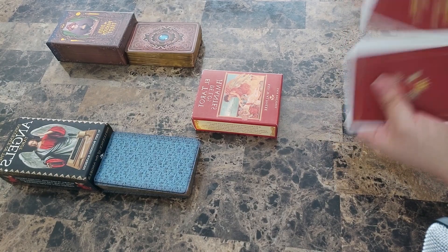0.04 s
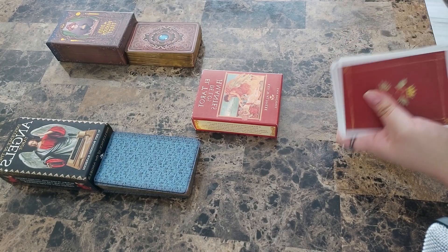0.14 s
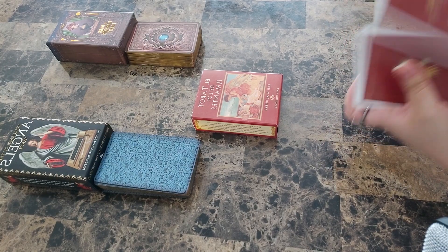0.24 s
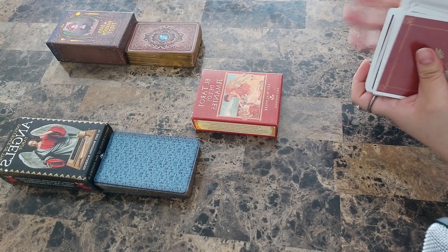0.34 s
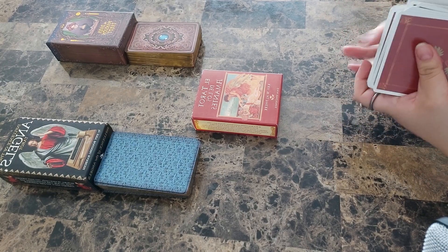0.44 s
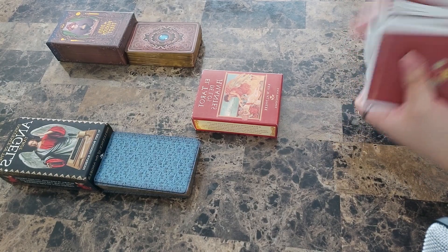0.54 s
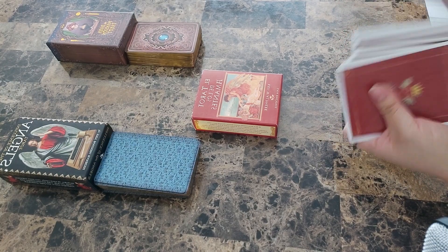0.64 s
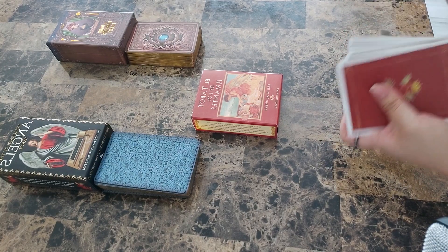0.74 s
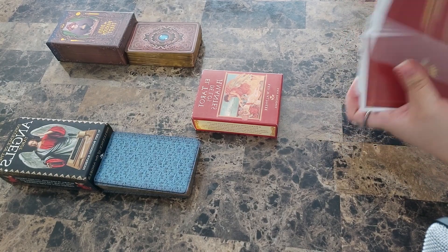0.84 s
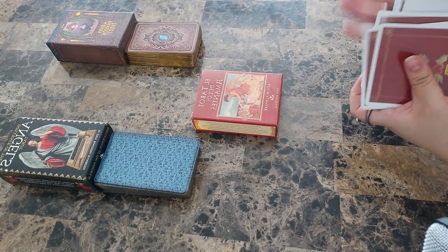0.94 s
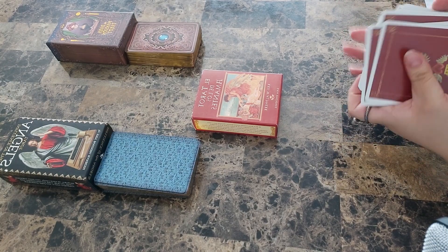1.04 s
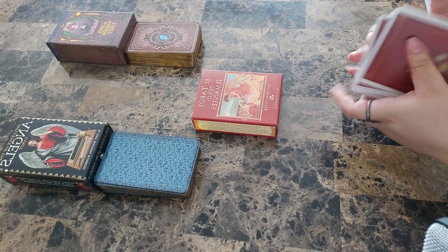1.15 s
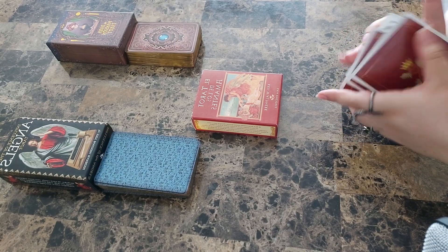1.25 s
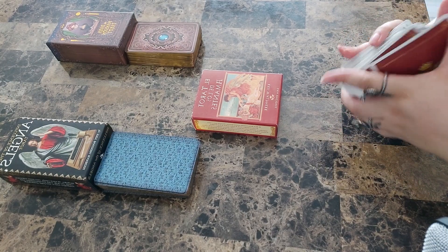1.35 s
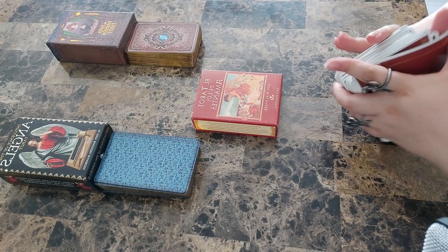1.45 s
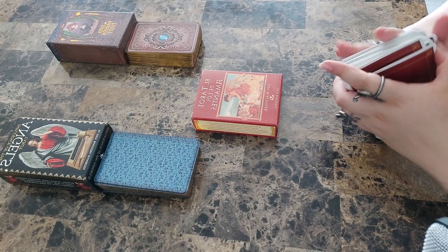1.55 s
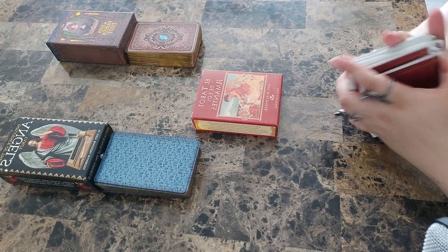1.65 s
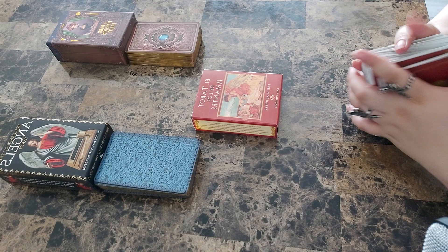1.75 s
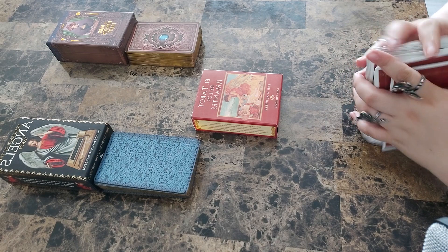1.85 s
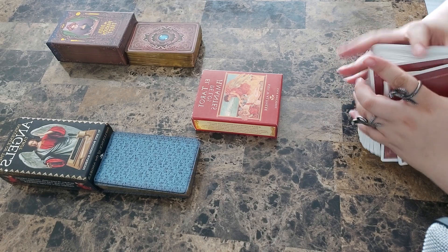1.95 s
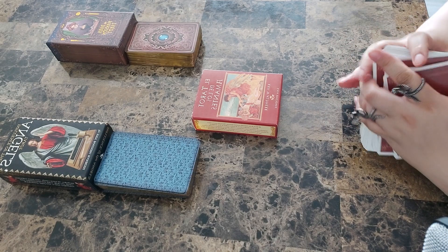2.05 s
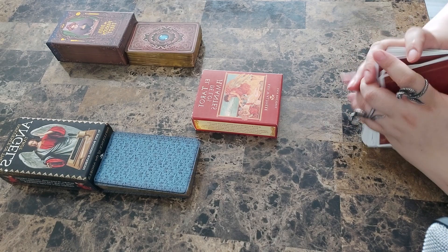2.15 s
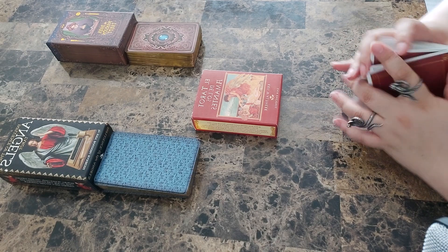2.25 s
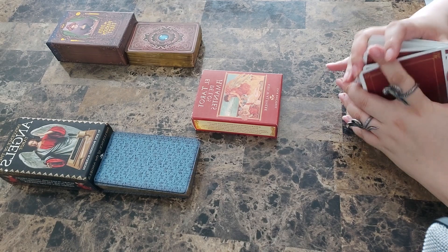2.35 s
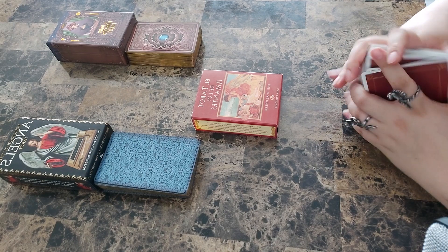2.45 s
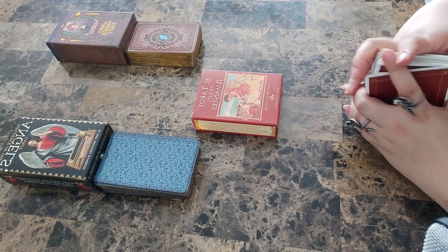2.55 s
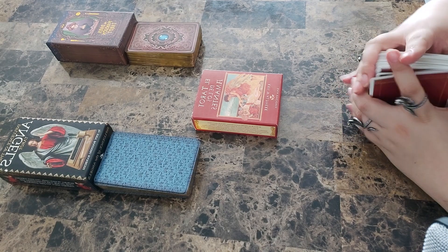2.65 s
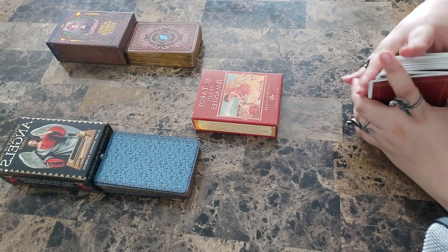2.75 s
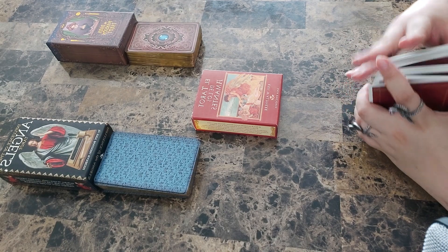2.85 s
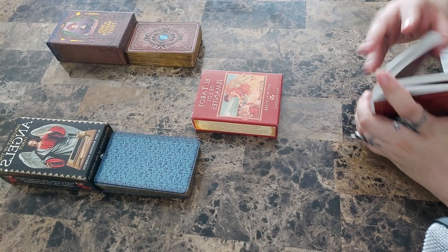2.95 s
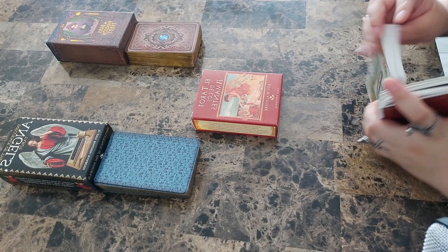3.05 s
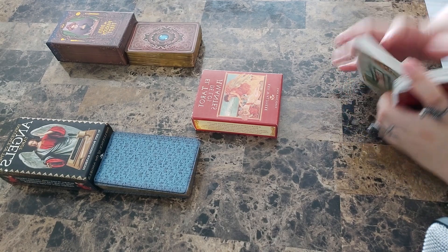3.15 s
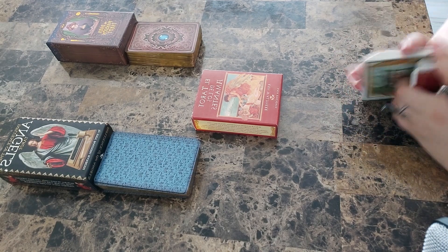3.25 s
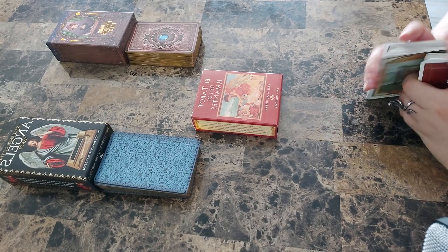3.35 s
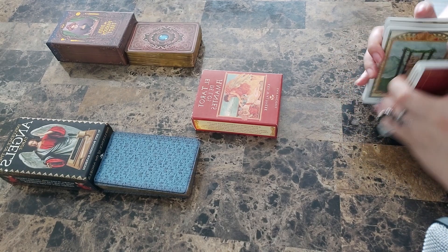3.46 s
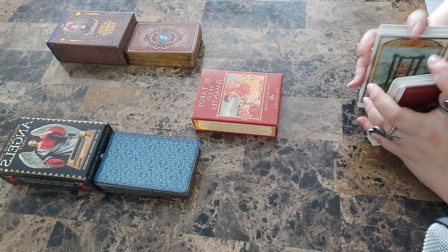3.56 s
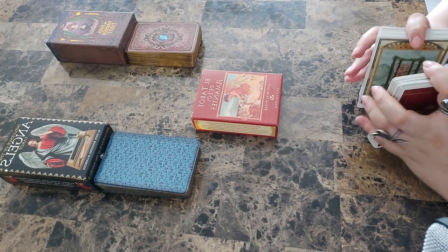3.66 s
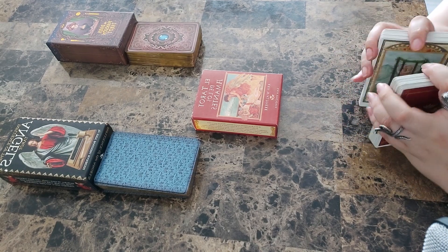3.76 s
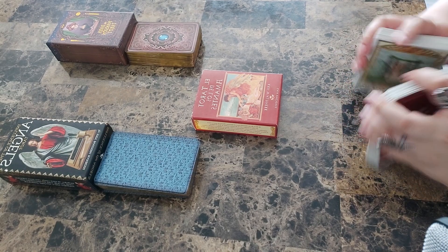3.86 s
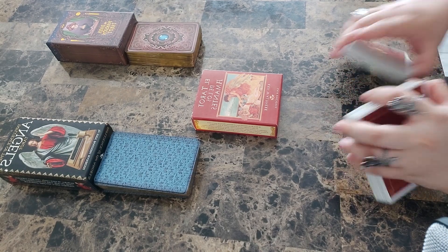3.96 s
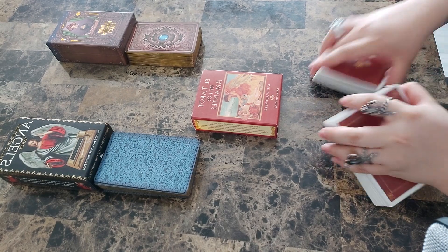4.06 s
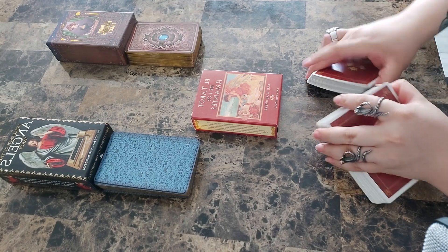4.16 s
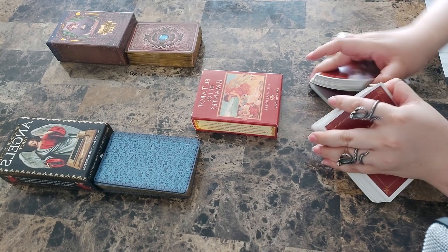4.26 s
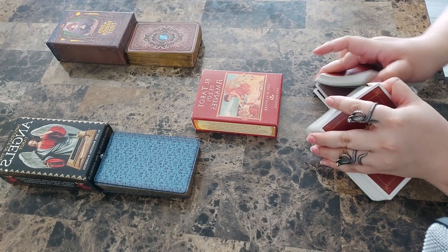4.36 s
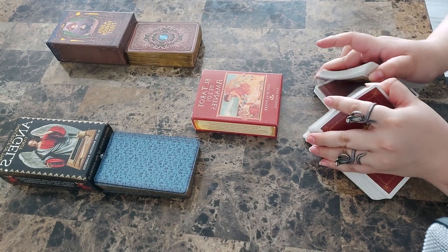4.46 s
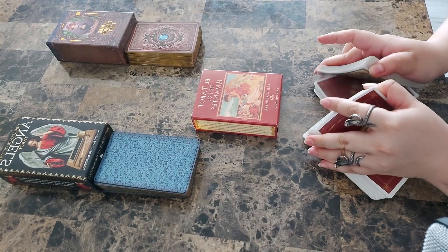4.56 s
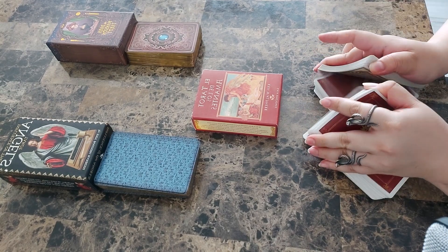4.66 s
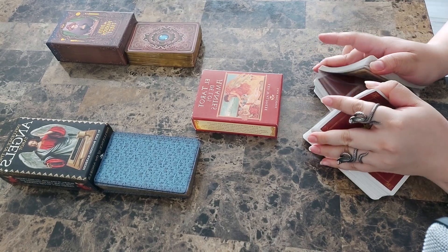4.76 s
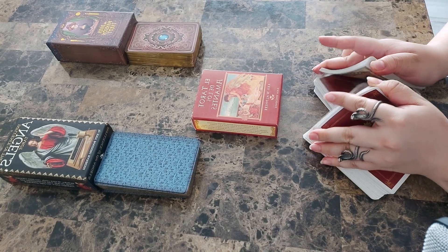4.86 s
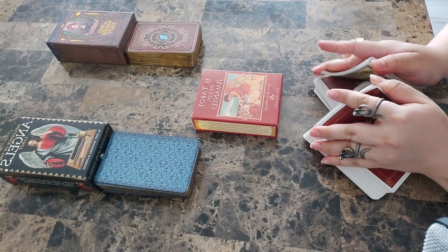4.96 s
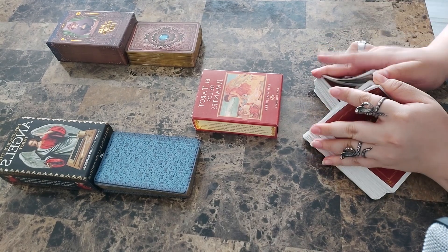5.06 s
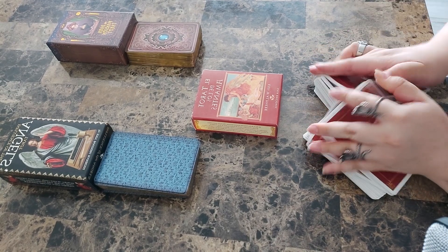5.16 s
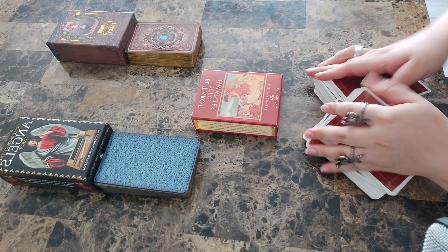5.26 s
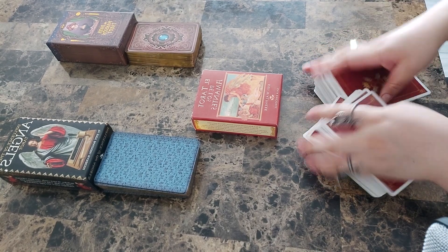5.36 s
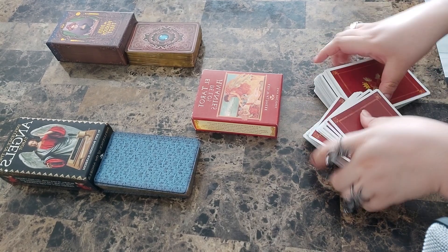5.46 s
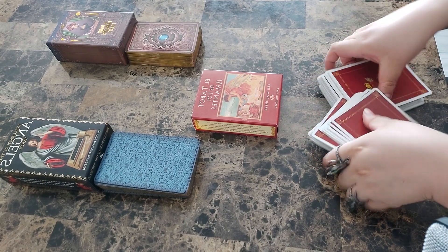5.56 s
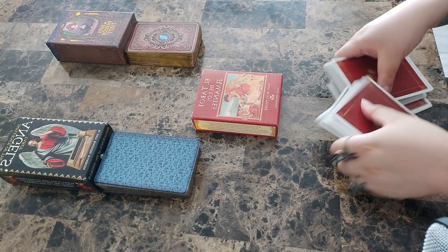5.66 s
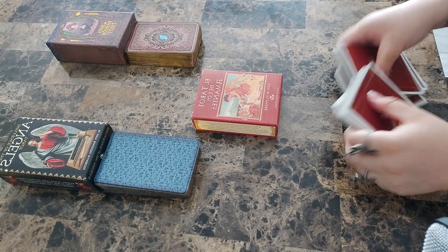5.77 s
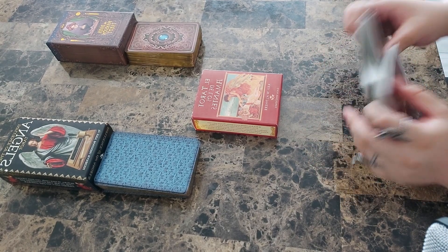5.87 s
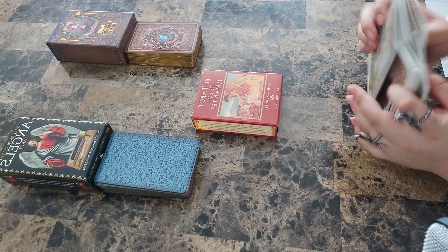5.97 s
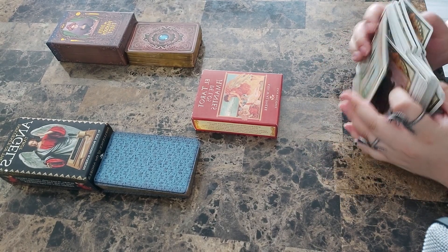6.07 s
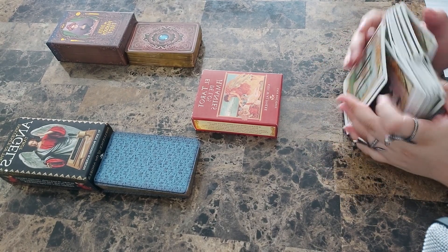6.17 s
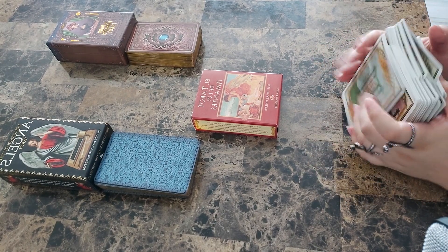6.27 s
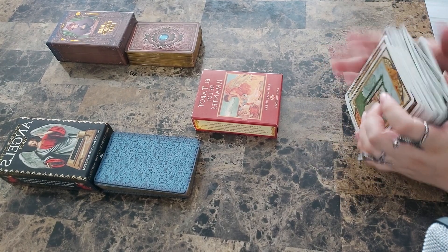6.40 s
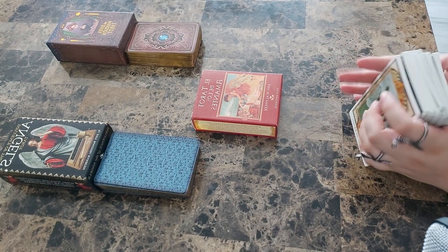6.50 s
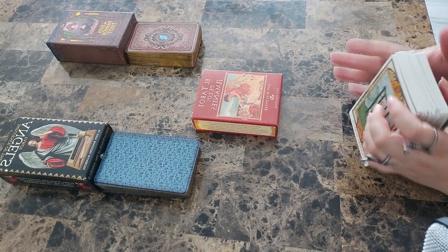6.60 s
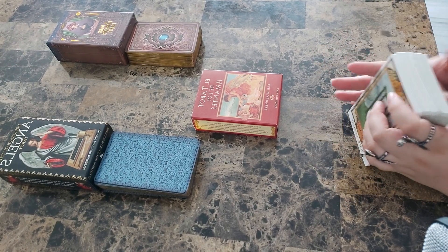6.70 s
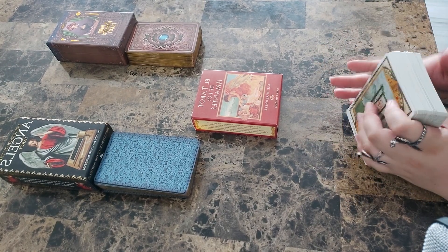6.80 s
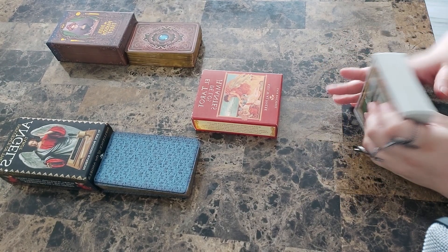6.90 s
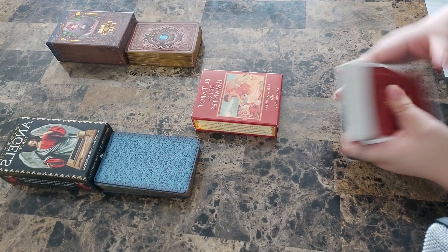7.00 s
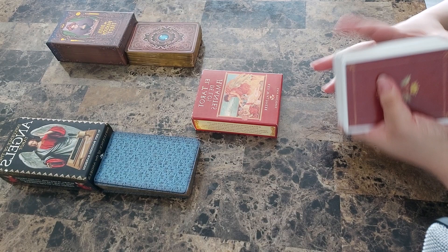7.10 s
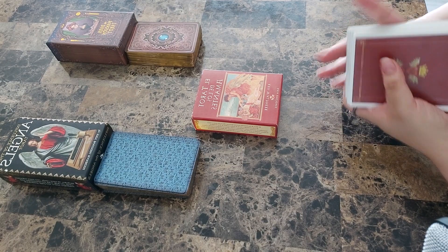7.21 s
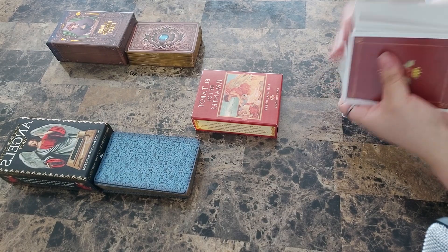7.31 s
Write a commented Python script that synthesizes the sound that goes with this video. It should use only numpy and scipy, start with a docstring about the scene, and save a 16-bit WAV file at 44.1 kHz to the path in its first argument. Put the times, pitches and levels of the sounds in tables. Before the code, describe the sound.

Hands shuffle a thick deck of large cards over a stone table: soft scrapes and slaps, a loud crackling riffle, then firm packet smacks in an echoing room.

```python
"""Card edges snap and packets slap together as two hands shuffle a thick deck of large cards
over a stone table in a bare, echoing room: short noise bursts ring the deck and the table.
Packets scrape into each other as noise with a quick bite, faces swish past one another as swelling
airy noise, deck and knuckles knock on the table modes and presses rumble through them.
Decaying noise makes the reflections, over a faint steady rumble and hiss of the house."""
import sys
import numpy as np
from scipy import signal
from scipy.io import wavfile
from scipy.ndimage import map_coordinates

SR = 44100
rng = np.random.default_rng(int(sys.argv[2]) if len(sys.argv) > 2 else 0)


def generate_wav(signal):
    """Clip the signal to [-1, 1] and save it as 16-bit WAV at the path in sys.argv[1]."""
    frames = np.transpose(np.atleast_2d(signal))
    scaled = np.clip(frames, -1, 1) * 32767
    pcm = np.round(scaled).astype(np.int16)
    wavfile.write(sys.argv[1], SR, pcm)


N = 323694

# Resonances of the stone table. Each row: centre in Hz, width in Hz, level in dB.
TABLE_MODES = [(99.7, 28, 1), (140, 18, 3), (200.4, 17.7, 2), (297.6, 44, 3), (367, 116, -2),
               (507, 140, -0.5)]
OPEN_HZ = 7000   # lowpass corner of a contact at brightness 0


def from_db(db):
    """Amplitude gain of a level in dB."""
    return 10 ** (np.asarray(db) / 20)


def rms_one(x):
    """Scale to an RMS of 1."""
    return x / np.sqrt(np.mean(x ** 2) + 1e-20)


def at_hz(points, hz):
    """Read a curve of (Hz, value) points along log frequency."""
    curve_hz, values = np.transpose(points)
    return np.interp(np.log(hz), np.log(curve_hz), values)


def over_time(points):
    """Draw a curve of (s, value) points over the whole scene."""
    return np.interp(np.arange(N) / SR, *np.transpose(points))


def band(x, low_hz, high_hz, order=2):
    """Bandpass; the tiny offset keeps the filter out of denormal numbers."""
    sos = signal.butter(order, [low_hz, high_hz], "band", fs=SR, output="sos")
    return signal.sosfilt(sos, x + 1e-18)


def resonance(x, hz, width_hz):
    """One damped mode: a two-pole resonator that rings longer the narrower it is."""
    r = np.exp(-np.pi * width_hz / SR)
    poles = [1, -2 * r * np.cos(2 * np.pi * hz / SR), r * r]
    return (1 - r * r) / 2 * signal.lfilter([1, 0, -1], poles, x + 1e-18)


def resonate(x, modes):
    """Parallel resonances with alternating signs."""
    out = 0
    for k, (hz, width_hz, level_db) in enumerate(modes):
        out = out + (-1) ** k * from_db(level_db) * resonance(x, hz, width_hz)
    return out


def grit(spread_db):
    """Dense contact noise whose grains have uneven sizes."""
    size = np.minimum(rng.exponential(1, N), 5)
    return rms_one(rng.standard_normal(N) * from_db(spread_db * size))


def swells(rows, rise_db_per_s, fall_db_per_s):
    """Gain of gestures that rise, hold and fall at steady dB rates; their powers add."""
    t = np.arange(0, N / SR + .01, .002)
    s, db, hold = np.transpose(rows)[:, :, None]
    before = np.maximum(s - t, 0)
    after = np.maximum(t - s - np.abs(hold), 0)
    level_db = db - rise_db_per_s * before - fall_db_per_s * after
    gain = np.sqrt(np.sum(from_db(level_db) ** 2, axis=0))
    return np.interp(np.arange(N) / SR, t, gain)


def contacts(starts, levels_db, brightness, lengths, shape, first_touch_db, dullest_hz, order, crack_s=None):
    """Rows of contact force, one for each level column; brightness sets the lowpass on the first."""
    out = np.zeros((levels_db.shape[1], N))
    noise = grit(spread_db=5.0)
    lengths = np.maximum(lengths, 5e-4)
    for s, gains, bright, length in zip(starts, from_db(levels_db), brightness, lengths):
        i = round(s * SR)
        count = min(N - i, int(6 * length * SR))
        force = shape(np.arange(count) / (length * SR)) * noise[i:i + count]
        force[0] += from_db(first_touch_db)   # the clean click of the first touch
        force = gains[:, None] * force
        if crack_s:   # the second row is shorter still
            force[1] *= np.exp(-np.arange(count) / (crack_s * SR))
        top_hz = np.clip(OPEN_HZ * 2 ** bright, dullest_hz, 15000)
        lowpass = signal.butter(order, top_hz, fs=SR, output="sos")
        force[0] = signal.sosfilt(lowpass, force[0])
        out[:, i:i + count] += force
    return out


def octave_noise(length, step):
    """Yields centre Hz and stereo noise of each band; the two ports agree in the bass only."""
    edges_hz = 25 * 2 ** np.arange(0, 9.6, step)   # step in octaves
    white = rng.standard_normal((2, 2, length))
    for k, (low, high) in enumerate(zip(edges_hz, edges_hz[1:])):
        mid, side = band(white[k % 2], low, high)
        hz = np.sqrt(low * high)
        alike = .93 / (1 + (hz / 900) ** 2.7)
        yield hz, np.sqrt(1 + alike) * mid + np.sqrt(1 - alike) * side * [[1], [-1]]


def ambience():
    """Faint steady rumble and hiss of the house: noise bands weighted by a spectrum."""
    # Spectral tilt of the house. Each row: frequency in Hz, relative density in dB per Hz.
    spectrum = [(25, -29.5), (55, -6), (85, -24.5), (120, -8.5), (146, -9), (185, -6.5), (260, -19),
                (500, -28.5), (1020, -32), (16000, -59)]
    level_db = -59
    noise = sum(from_db(at_hz(spectrum, hz)) * part for hz, part in octave_noise(N, step=.5))
    return from_db(level_db) * rms_one(noise)


def reflections():
    """Dense reflections that build up at once and die band by band; mean energy 1 per port."""
    # How long the bare room rings. Each row: frequency in Hz, time to fall by 60 dB in seconds.
    decay_times = [(120, 0.51), (500, 0.35), (2000, 0.43), (5000, 0.36), (12000, 0.26)]
    buildup_s = 0.00081
    t = np.arange(SR) / SR
    echo = sum(part * from_db(-60 * t / at_hz(decay_times, hz)) for hz, part in octave_noise(SR, step=.5))
    echo = echo * (1 - np.exp(-(t / buildup_s) ** 2))
    return echo / np.sqrt(np.sum(echo ** 2) / 2)


def room(x, count=4):
    """Several random reflection patterns fade into one another in turn, so no one echo colour stays."""
    turn_s = .45   # seconds from one pattern to the next
    turn = np.arange(N) / SR / turn_s
    out = 0
    for k in range(count):
        distance = (turn - k + count / 2) % count - count / 2   # the patterns recur in turn
        share = np.cos(np.pi / 2 * np.clip(distance, -1, 1))
        out = out + signal.fftconvolve((x * share)[None], reflections(), axes=1)[:, :N]
    return out


def ports(near):
    """The left port hears later, by a lag that wanders at random; the stereo balance drifts."""
    # Stereo balance. Each row: time in seconds, left minus right level in dB.
    pan_points = [(0, 1), (.8, -3.5), (1.8, 2.5), (3.7, 3.5), (4.6, 0.5), (5.6, 2.5), (7.34, 5.5)]
    mean_lag, lag_wander = 6, 1.8   # samples
    knots = np.arange(0, N + 2000, 2000)
    wander = np.interp(np.arange(N), knots, rng.standard_normal(len(knots)))
    lag = mean_lag + lag_wander * wander
    left = map_coordinates(near, [np.arange(N) - lag], order=3)
    return np.stack([left, near]) * from_db(over_time(pan_points) * [[.5], [-.5]])


def press_rumble():
    """Hands pressing deck and table: lumpy noise swells through the table modes."""
    # Presses. Each row: time of full level in seconds, level in dB, hold in seconds.
    presses = [(1.75, -51.5, 0.18), (2.5, -45, 0.061), (3.35, -54.5, 0.2), (4.55, -41.5, 0.57),
               (5.58, -43, 0.091), (6.35, -47.5, 0.2)]
    gain = swells(presses, rise_db_per_s=88.5, fall_db_per_s=72.5)
    return rms_one(resonate(grit(spread_db=5.5), TABLE_MODES)) * gain


def face_swish():
    """Airy swish of wide glossy faces gliding past each other, different at each port."""
    # Glides. Each row: time of full level in seconds, level in dB, hold in seconds.
    glides = [(0, -58.5, .12), (.55, -60.5, 0.036), (.68, -56.5, 0.012), (1.1, -57.5, 0.0066),
              (1.33, -60, 0.012), (1.58, -59, 0.0067), (1.74, -64, .01), (1.95, -61.5, 0.08),
              (2.28, -57.5, 0.0044), (2.6, -69.5, .3), (3.3, -55.5, 0.0079), (3.5, -66.5, 0.18),
              (3.97, -61.5, 0.032), (4.12, -70, 0.4), (4.52, -57, 0.116), (4.78, -45, 0.31),
              (5.15, -53, 0.088), (5.4, -65.5, 0.29), (6.05, -50.5, 0.041), (6.27, -50.5, 0.019),
              (6.48, -61, .08), (6.95, -61.5, 0.017), (7.04, -71.5, 0.027)]
    faces = np.stack([grit(spread_db=5.0), grit(spread_db=6.0)])
    gain = swells(glides, rise_db_per_s=103.5, fall_db_per_s=142.5)
    return rms_one(band(faces, 2500, 12000, order=1)) * gain


def knocks():
    """Soft blows of deck and knuckles ring the table; the duller, the lower the modes they reach."""
    # Knocks. Each row: start in seconds, force in dB before the table rings,
    # brightness in octaves re OPEN_HZ.
    blows = [(1.549, -42.5, -5), (1.585, -46, -2.5), (1.666, -44, -3), (1.767, -46, -2), (1.947, -44, -2.5),
             (2.052, -41, -5.5), (2.496, -35, -4.5), (2.789, -33, -4), (3.309, -32.5, -5),
             (3.625, -19.5, -6), (4.087, -42, -6), (4.162, -35.5, -3.5), (4.199, -37, -4),
             (4.357, -37, -0.5), (4.49, -28, -6.5), (4.658, -35, -1.5), (4.774, -31, -3.5),
             (4.845, -23, -0.5), (5.126, -16, -5), (5.229, -26, -1), (5.289, -31.5, -5.5),
             (5.504, -27.5, -4), (5.588, -30.5, -3), (5.644, -31.5, -1), (6.129, -27, -4.5),
             (6.722, -32, -4)]
    dying_s = 0.007
    s, force_db, bright = np.transpose(blows)
    force, = contacts(s, force_db[:, None], bright, dying_s + 0 * s, lambda u: np.exp(-u),
                      first_touch_db=23.0, dullest_hz=79.4, order=2)
    return from_db(19.5) * resonate(force, TABLE_MODES)


def card_sound(body, air, thud, thud_modes, ring, cup=0):
    """Contact force rings the deck and shakes what holds the cards; apart from it, the edge hiss."""
    # Resonances of the deck. Each row: centre in Hz, width in Hz, lift in dB at ring 1.
    deck_modes = [(946, 380, 2), (1610, 840, 4), (2510, 700, 2), (3870, 1400, 2.5)]
    cup_hz, cup_width_hz = 2435, 940
    deck = band(body, 340, 15000, order=1)
    hollow = resonance(resonance(deck, cup_hz, cup_width_hz), cup_hz, cup_width_hz)
    hollow = cup * hollow
    for hz, width_hz, lift_db in deck_modes:
        deck = deck + (from_db(ring * lift_db) - 1) * resonance(deck, hz, width_hz)
    cards = from_db(4.5) * (deck + hollow) + from_db(22.5) * resonate(thud, thud_modes)
    return cards, band(air, 3300, 17000)


def scrapes():
    """Friction bites quickly and stops as a packet slides home; held cards ring more, low modes less."""
    # Packets scraped into each other. Each row: start in seconds, body force in dB,
    # brightness in octaves re OPEN_HZ, dying time in seconds (at least 0.5 ms).
    scrape_rows = [(0.005, -56, 0.4, .06), (.353, -41.5, -0.7, 0.036), (0.396, -33, 0.9, 0.01),
                   (0.688, -65.5, -3, 0.01), (0.936, -42.5, 0.7, 0.03), (0.986, -46, 1.2, 0.048),
                   (1.178, -42, -2.3, 0.012), (1.302, -54, -0.5, 0.019), (1.537, -60.5, -0.8, 0.058),
                   (1.695, -50, -2.5, 0.039), (1.789, -48.5, -2.5, 0.12), (1.828, -54.5, -1.5, 0.027),
                   (1.89, -59, 0.4, 0.051), (1.96, -50.5, 1.5, 0.04), (2.313, -59, 0.1, .034),
                   (2.428, -56, -0.5, 0.05), (2.447, -41.5, -0.9, 0.038), (2.518, -30, -1, 0.024),
                   (2.552, -34.5, -0.41, 0.025), (2.7, -35.5, -0.38, 0.0067), (2.789, -36, -1.1, 0.01),
                   (3.064, -32, -0.65, 0.036), (3.138, -27.5, -0.5, 0.045), (3.439, -46.5, -0.64, 0.11),
                   (3.462, -30.5, -1.14, 0.013), (3.534, -40.5, -1.5, 0.055), (3.611, -37.5, 0.6, 0.028),
                   (3.62, -19.5, -0.63, 0.018), (3.838, -38.5, -0.6, 0.011), (4.166, -37.5, -3, 0.036),
                   (4.362, -41, -3, 0.044), (4.842, -33, -0.5, 0.0072), (5.123, -31, -0.8, 0.0095),
                   (5.674, -36, -0.26, 0.031), (6.011, -56.5, 2, .062), (6.083, -34.5, -2.5, 0.033),
                   (6.106, -23, -0.54, 0.041), (6.157, -24, -0.28, 0.057), (6.433, -29.5, -0.75, 0.037),
                   (6.462, -33, -0.38, 0.067), (6.698, -36.5, -1, 0.056), (6.724, -31.5, -0.13, 0.012),
                   (6.923, -50, 9, 0.033), (6.999, -49.5, -2.5, 0.015)]
    # Edge hiss, bright while card edges are free, dull while the deck is cupped.
    # Each row: time in seconds, hiss force in dB re body.
    treble = [(0, -11), (.4, -2), (.65, 21), (.93, -5), (1.2, 7), (1.55, -15), (1.8, -21), (1.95, -7),
              (2.4, -41), (2.8, -40), (3.06, -18.5), (3.85, -39.5), (4.2, -28.5), (5.67, -27), (6.0, -19.5),
              (6.1, -25), (6.7, -24), (6.95, -3)]
    # Hollow between cupped hands and deck, ringing with the scrapes.
    # Each row: time in seconds, level in dB re body.
    cupping = [(2.2, -32), (2.45, -5), (2.6, 2), (2.8, 10), (3.07, 11.5), (3.2, -3), (3.6, 3), (5.5, -13),
               (6.5, 0.5)]
    thud_db = -9.5   # force re body
    s, body_db, bright, length = np.transpose(scrape_rows)
    hiss_db = body_db + np.interp(s, *np.transpose(treble))
    levels_db = np.stack([body_db, hiss_db, body_db + thud_db], axis=1)
    forces = contacts(s, levels_db, bright, length, lambda u: (1 - np.exp(-22.0 * u)) * np.exp(-u),
                      first_touch_db=-2.0, dullest_hz=550, order=6)
    # without the two lowest table modes
    return card_sound(*forces, TABLE_MODES[2:], ring=1.79, cup=from_db(over_time(cupping)))


def small_cards():
    """Rows like the snaps, at random moments and strengths, falling between the loud riffle snaps."""
    start_s, end_s, cards_per_s = 4.48, 5.25, 70.0
    softest_db, mean_rise_db = -39.5, 3.55   # body force
    when, size, tone = rng.random((150, 3)).T
    s = start_s + np.cumsum(-np.log(1 - when)) / cards_per_s
    body_db = softest_db - mean_rise_db * np.log(1 - size)
    crack_db = 0 * s   # re body
    rows = np.stack([s, body_db, -1.15 * tone, crack_db], axis=1)
    return rows[s < end_s]


def snaps():
    """Sudden contacts of edges and packets: force jumps up, then dies away exponentially."""
    # Loud snaps. Each row: start in seconds, body force in dB, brightness in octaves re OPEN_HZ,
    # crack force in dB re body.
    loud_snaps = [(.164, -38, -.5, 3.5), (.365, -27.5, -0.2, -30), (.416, -24, 0.057, -7),
                  (.738, -38, -1.14, -5), (.944, -30, -3.7, -17), (.966, -31.5, -0.4, -7),
                  (1.184, -38, 9, 0), (1.19, -34.5, -3, 10), (1.446, -51.5, -1, 6), (1.95, -34, -0.8, -23),
                  (2.284, -35, -2, -38), (3.621, -21.5, -0.98, -18.5), (4.163, -35.5, -0.4, -27.5),
                  (4.357, -27.5, -2, -44.5), (4.447, -38.5, -0.5, -10), (4.474, -29.5, -0.6, -18),
                  (4.497, -29.5, 0.5, -19), (4.519, -13.5, -1.5, -7.5), (4.567, -25.5, 0.2, -22),
                  (4.6, -13.5, 0.1, 8), (4.658, -25, 0, -5.5), (4.742, -23.5, -1.2, -26),
                  (4.772, -14.5, 0.6, -5), (4.784, -25, 0, 7), (4.819, -16, -2.1, -3.5),
                  (4.836, -16, 0.2, 0.5), (4.925, -11, -0.3, -1), (4.969, -10, 0.1, 0), (4.999, -32, -3, 6),
                  (5.03, -10.5, -4, -6.5), (5.051, -18, 0.5, 1), (5.117, -14.5, -1, -3.5),
                  (5.132, -24, -2.5, 2), (5.141, -21.5, 2, -5), (5.149, -19, -0.05, -3),
                  (5.185, -19, 0.5, 3.5), (5.232, -24, 0.7, 6), (5.386, -44, 0.4, -3),
                  (5.503, -32, -0.66, -9), (5.589, -37, -0.6, -19), (5.671, -11.5, -1.57, -36),
                  (5.768, -14, -1.91, -47.5), (5.817, -24, -1, -14.5), (6.16, -6.5, -0.62, -41.5),
                  (6.166, -9.5, -0.35, -5), (6.405, -24, -1.75, -42), (6.439, -28, -0.77, -39),
                  (6.526, -40.5, -3.9, 7)]
    dying_s, crack_dying_s = 0.0036, .003   # the crack has both decays
    attack = 8.9   # rate of the attack re the dying
    thud_db = -19   # force re body
    s, body_db, bright, crack_db = np.vstack([loud_snaps, small_cards()]).T
    levels_db = np.stack([body_db, body_db + crack_db, body_db + thud_db], axis=1)
    forces = contacts(s, levels_db, bright, dying_s + 0 * s,
                      lambda u: (1 - np.exp(-attack * u)) * np.exp(-u),
                      first_touch_db=13.5, dullest_hz=1600, order=3, crack_s=crack_dying_s)
    return card_sound(*forces, TABLE_MODES, ring=1.0)


def scene():
    """Mix the close sounds at both ports, their reflections and the house."""
    snap, crack = snaps()
    scrape, hiss = scrapes()
    swish = face_swish()
    table = press_rumble() + knocks()
    # the edge hiss of the snaps beams at the microphone and reaches the walls weaker
    sent = from_db(-4) * (snap + from_db(-6) * crack)
    sent = sent + from_db(0.32) * (scrape + hiss)
    sent = sent + from_db(-6.5) * (swish[0] + table)
    near = snap + crack + scrape + hiss + table
    return ports(near) + swish + room(sent) + ambience()


def record(dry):
    """The highest peaks are rounded, the top is cut steeply."""
    rounded = dry / (1 + np.abs(dry / .9) ** 4) ** .25
    steep_cut = signal.cheby2(12, 70, 16500, fs=SR, output="sos")   # 70 dB down from 16500 Hz up
    return signal.sosfilt(steep_cut, rounded)


dry = scene()
out = record(dry)
generate_wav(out)
```